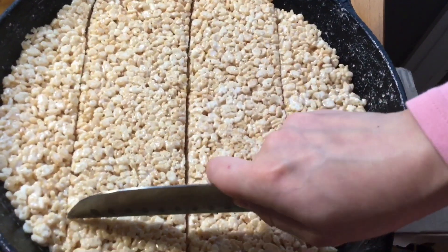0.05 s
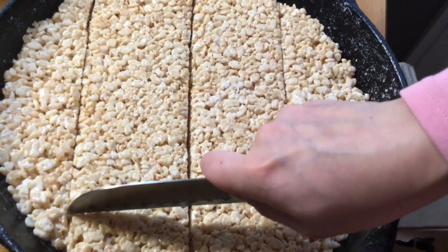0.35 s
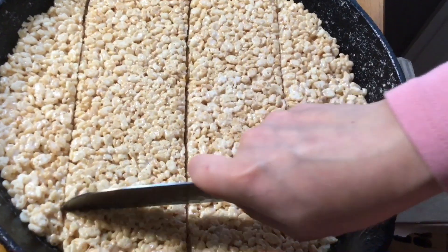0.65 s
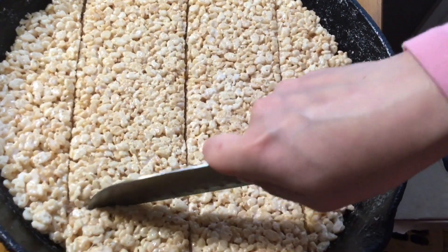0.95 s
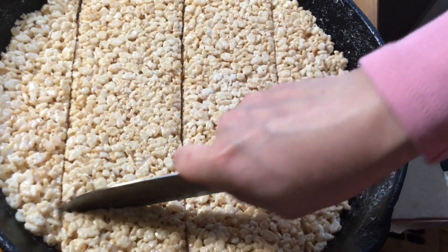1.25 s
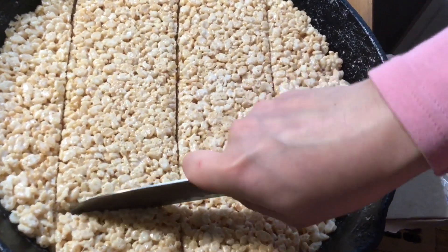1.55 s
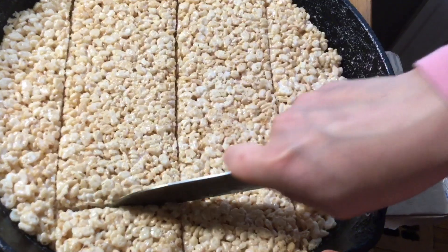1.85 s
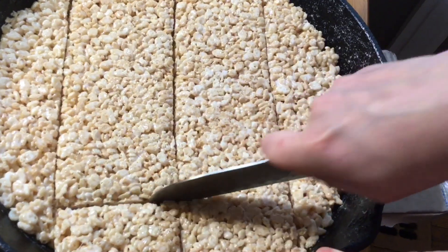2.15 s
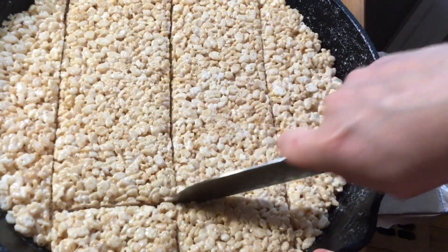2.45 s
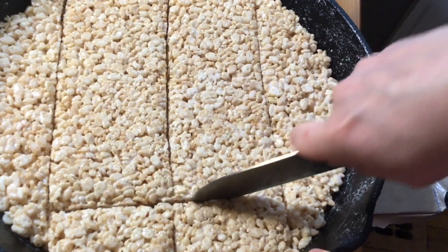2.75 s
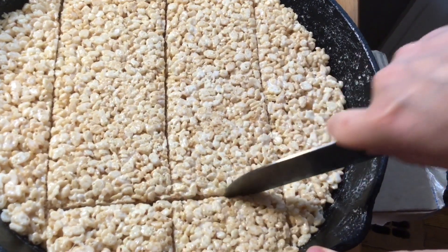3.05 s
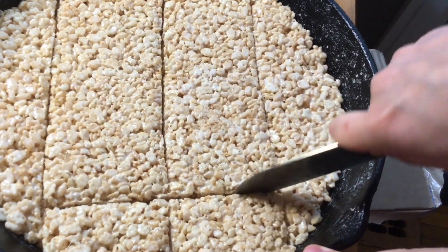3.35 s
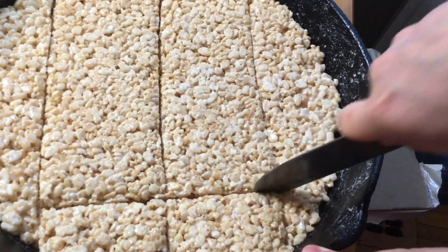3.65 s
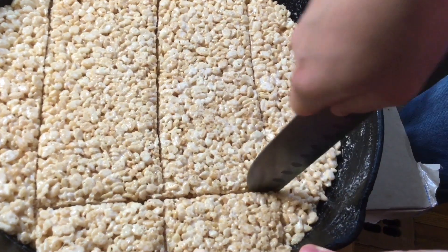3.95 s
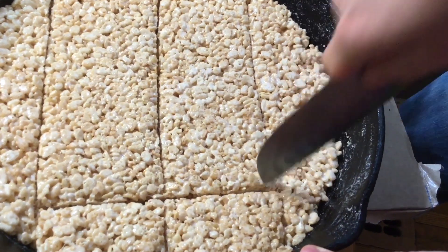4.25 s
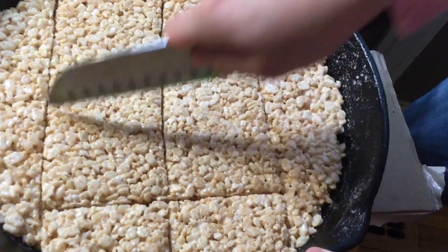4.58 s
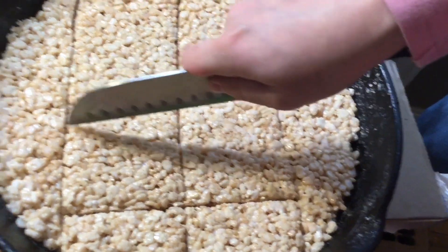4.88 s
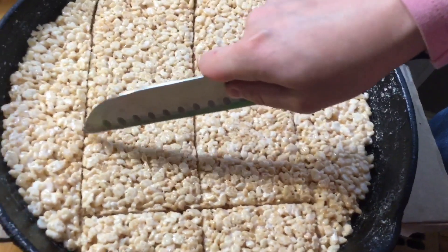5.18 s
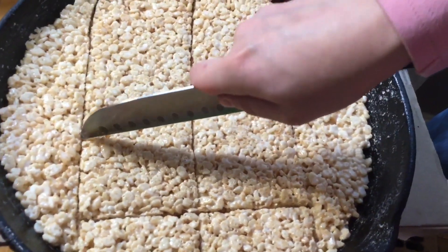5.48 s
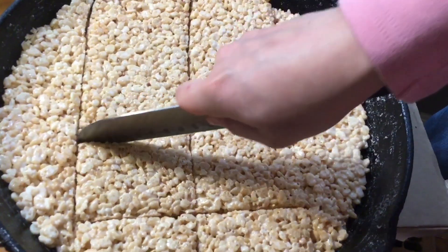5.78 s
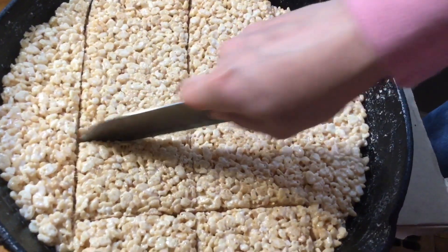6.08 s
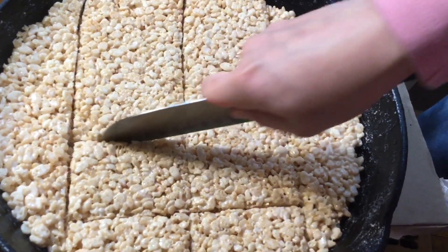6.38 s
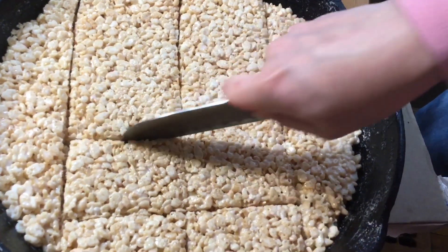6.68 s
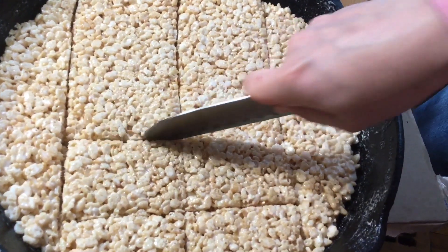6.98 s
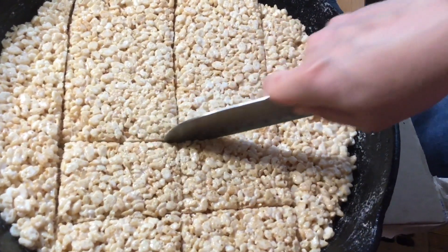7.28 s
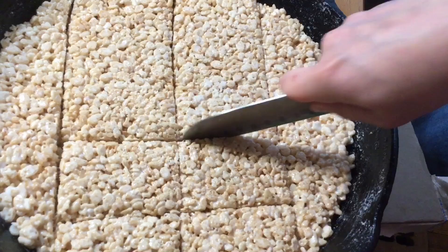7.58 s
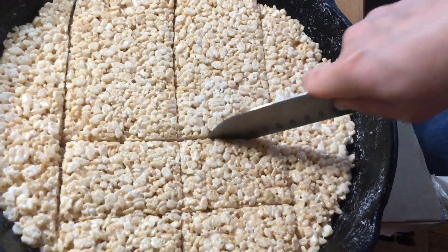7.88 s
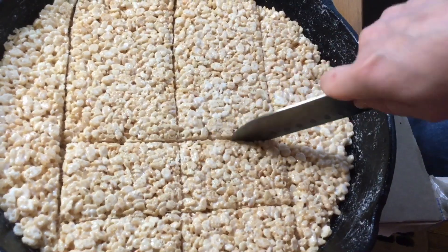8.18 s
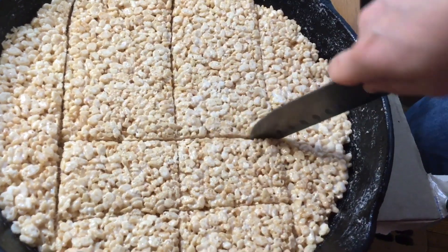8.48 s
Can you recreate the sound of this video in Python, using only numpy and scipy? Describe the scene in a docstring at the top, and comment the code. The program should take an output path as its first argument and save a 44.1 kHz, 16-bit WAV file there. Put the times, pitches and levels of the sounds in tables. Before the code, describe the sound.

A knife rests on crisp rice cereal treats in an iron skillet, giving faint ticks and a few tiny snaps. From about 0.5 seconds it rocks through the slab in quick, uneven pushes, each a burst of bright, dry crackle with sharp snaps. The crunch grows deeper, and between 2.5 and 3.7 seconds the blade clacks lightly on the iron several times while the pan thuds softly on the table. The cut fades by 4.3 seconds, leaving a pause with a faint bump or two. At about 5.6 seconds a second cut begins, crackling and crunching in the same way, with short knocks on the iron, clearest around 6.1, 7.3 and 7.9 seconds. It ends near 8.5 seconds with a few faint ticks. Everything is close, in a quiet kitchen with a steady low electrical hum.

```python
"""Faint ticks and a few snaps come first: a knife rests on crisp rice treats in an iron skillet.
It then rocks through the slab in two long cuts, close by in a quiet kitchen. Each push bursts a
shower of puffed grains, crunches deeper and often ends with the blade knocking on the iron.
Pan and table thud under the hand; a low mains hum runs throughout."""
import sys
import numpy as np
from scipy import signal
from scipy.fft import rfft, irfft
from scipy.io import wavfile
from scipy.ndimage import uniform_filter1d

SR = 44100
rng = np.random.default_rng(int(sys.argv[2]) if len(sys.argv) > 2 else 0)


def to_wav(s):
    """Save 16-bit WAV."""
    ch = np.atleast_2d(s).T  # columns
    pcm = np.round(np.clip(ch, -1, 1) * 32767)  # PCM
    wavfile.write(sys.argv[1], SR, pcm.astype(np.int16))


N = 384993

# Table levels are relative; each source adds its own gain.
# grains crushed by the pushes: (time [s], crackle level [dB], crunch level [dB])
CRUSH_LEVELS = [(0.36, -83, -88), (0.375, -46, -58), (0.42, -63, -72), (0.44, -68, -67), (0.46, -58, -72),
                (0.468, -66.5, -64), (0.508, -56, -70), (0.532, -47, -60), (0.564, -44.5, -58),
                (0.572, -36, -56), (0.612, -36.5, -57), (0.628, -36, -37), (0.656, -30.5, -50),
                (0.671, -36, -47), (0.687, -33.5, -51), (0.723, -37.5, -51), (0.751, -50.5, -59.5),
                (0.827, -47, -68), (0.855, -40, -58), (0.867, -47.5, -57), (0.899, -39, -68),
                (0.935, -46.5, -59.0), (0.943, -36.5, -57), (0.967, -57, -65), (0.991, -46, -63),
                (1.011, -44.5, -55), (1.031, -34.5, -57), (1.051, -37.5, -57), (1.075, -24, -52),
                (1.13, -33.5, -48), (1.146, -28, -49), (1.182, -58, -62), (1.23, -71, -73),
                (1.274, -43, -54.5), (1.374, -39, -45.5), (1.414, -59, -69), (1.418, -47, -63),
                (1.442, -30, -46.5), (1.514, -24.5, -35.5), (1.549, -60, -52), (1.589, -53, -65),
                (1.613, -40.5, -51.5), (1.713, -33.5, -37), (1.757, -40, -48.0), (1.773, -56, -61),
                (1.781, -36.0, -44.0), (1.801, -23.5, -39), (1.861, -30, -37), (1.885, -50, -49.5),
                (1.925, -60, -60), (1.988, -41, -48), (2.036, -37, -40), (2.104, -43, -52.5),
                (2.172, -23.5, -32), (2.252, -56, -57.5), (2.308, -37, -42.5), (2.328, -40.5, -44.5),
                (2.376, -33, -39), (2.412, -46, -50), (2.42, -50.0, -66), (2.423, -37.0, -46),
                (2.487, -33.5, -34), (2.551, -69, -62), (2.583, -43, -45.5), (2.627, -32.5, -41.5),
                (2.671, -46, -41), (2.711, -52, -57.5), (2.731, -38, -40.5), (2.775, -32.5, -38),
                (2.795, -58, -55), (2.819, -52, -59), (2.914, -41.5, -41.5), (2.974, -42.5, -42),
                (3.006, -46.5, -57), (3.03, -29, -35), (3.05, -37.5, -38), (3.082, -31.5, -37),
                (3.134, -42.5, -41.5), (3.146, -54, -59), (3.242, -36.5, -40), (3.282, -49.5, -58),
                (3.305, -35, -40), (3.357, -37, -37.5), (3.377, -61, -56), (3.433, -62, -58.5),
                (3.437, -49, -48), (3.501, -42, -42), (3.569, -54.0, -61), (3.577, -42.5, -54),
                (3.609, -69, -72), (3.625, -44, -47), (3.673, -38.5, -39.5), (3.685, -58, -59),
                (3.768, -72.5, -66.0), (3.78, -64, -60), (3.856, -67, -74.5), (3.888, -63, -69),
                (3.892, -36, -46.5), (3.972, -65.5, -74), (3.988, -42, -45), (4.012, -61.0, -64),
                (4.064, -78.5, -72), (4.104, -73.0, -63), (4.128, -79.0, -77), (4.172, -57.5, -57.5),
                (4.195, -64, -71), (4.215, -52.5, -55.5), (4.319, -86, -80), (5.59, -81, -84),
                (5.602, -88, -81), (5.61, -49, -57.5), (5.642, -40.5, -45), (5.67, -44.5, -59),
                (5.726, -37, -49.0), (5.758, -39, -52.0), (5.762, -32, -44), (5.854, -34, -46.5),
                (5.894, -62, -66.5), (5.938, -42.5, -54), (5.989, -50, -59.0), (6.037, -70, -79),
                (6.041, -47, -65), (6.049, -40.5, -54), (6.081, -33.5, -41), (6.129, -39, -55),
                (6.133, -36, -33), (6.145, -64, -49), (6.193, -62, -62), (6.209, -38.5, -40.5),
                (6.265, -38.5, -45.5), (6.333, -43.5, -55), (6.345, -50, -66), (6.365, -36.5, -50),
                (6.444, -37, -45.5), (6.488, -66, -66), (6.512, -42.0, -51.5), (6.584, -38, -45),
                (6.592, -31.5, -42.5), (6.652, -49.5, -60), (6.672, -32, -45.5), (6.704, -29, -39),
                (6.752, -47, -42.5), (6.792, -61, -64.0), (6.831, -41, -45), (6.927, -45, -53),
                (6.943, -67, -66), (6.959, -42, -58.5), (6.987, -35, -45), (6.999, -45, -48),
                (7.027, -30.5, -39), (7.071, -62, -60.5), (7.107, -40.5, -54), (7.119, -44.5, -53),
                (7.155, -36.5, -46.5), (7.211, -33, -44.5), (7.227, -48, -58), (7.298, -24.5, -34),
                (7.33, -50.0, -49), (7.378, -63, -52), (7.398, -38.5, -48), (7.486, -38.5, -44.5),
                (7.522, -50.0, -65), (7.594, -32, -35.5), (7.626, -61, -49), (7.65, -65.0, -58.0),
                (7.682, -39, -47), (7.69, -45, -53.0), (7.737, -38.0, -41.5), (7.805, -43.5, -51),
                (7.817, -60, -67), (7.833, -34, -51), (7.841, -42.0, -49.0), (7.869, -27.5, -36.5),
                (7.933, -59, -55), (7.961, -43.5, -51), (7.985, -47.5, -54.0), (8.033, -46.5, -48.5),
                (8.085, -47.5, -56), (8.097, -58, -66), (8.113, -40.5, -47), (8.148, -39.5, -52),
                (8.156, -34, -38.5), (8.184, -31, -45), (8.2, -50, -48), (8.224, -47.0, -57),
                (8.252, -36.5, -45), (8.264, -47.5, -55), (8.308, -36, -42.5), (8.34, -33, -47),
                (8.356, -45.5, -56.0), (8.42, -40.5, -45.5), (8.472, -63, -70.5), (8.56, -76.5, -74.5)]
# force reaching the pan: (time [s], drag level [dB], thud level [dB])
PAN_LEVELS = [(0.44, -79, -73.0), (0.536, -78, -78), (0.552, -62, -60), (0.608, -76, -61.5),
              (0.663, -60, -58.0), (0.687, -73, -53), (0.767, -77.0, -72), (0.991, -74.5, -70),
              (1.035, -72, -68.5), (1.146, -61.5, -45), (1.21, -77, -77), (1.382, -64, -64),
              (1.43, -83, -76.0), (1.45, -66, -62), (1.514, -50, -43.5), (1.597, -74.0, -57),
              (1.725, -60.5, -68), (1.769, -79, -62), (1.797, -56, -49), (1.853, -60, -51),
              (1.857, -41, -51), (1.877, -51, -44.5), (1.937, -68, -57.5), (2.04, -66.0, -64),
              (2.088, -67.0, -61.0), (2.128, -63.0, -58), (2.208, -50.5, -52), (2.268, -77, -59),
              (2.356, -55.5, -58), (2.392, -70, -64), (2.523, -52, -48), (2.555, -64.5, -68),
              (2.603, -78, -64.0), (2.651, -45.5, -55), (2.683, -55, -51), (2.727, -75, -72),
              (2.759, -65, -56), (2.807, -54, -49), (2.859, -70.0, -70), (2.934, -66, -60),
              (2.946, -48, -56.5), (2.978, -55, -53), (3.006, -75.5, -43), (3.026, -67, -60),
              (3.066, -58.5, -55), (3.194, -68, -66), (3.337, -67.0, -60), (3.357, -68, -46),
              (3.381, -66.5, -45), (3.401, -67.5, -71), (3.549, -58.5, -54), (3.629, -88, -78),
              (3.681, -62.0, -46), (3.729, -57, -56), (3.784, -76.0, -70.5), (3.968, -81, -76.0),
              (4.024, -79, -63), (4.1, -77.5, -80), (5.57, -78.5, -77), (5.65, -61.5, -57),
              (5.686, -73, -62), (5.71, -65.0, -60), (5.854, -52.5, -53), (5.922, -88, -70.0),
              (5.938, -64, -67.0), (6.037, -73, -77.5), (6.089, -46, -48), (6.157, -59, -47.5),
              (6.193, -66, -59.5), (6.237, -54, -49.0), (6.273, -58, -67), (6.349, -70, -76),
              (6.365, -60, -66), (6.44, -49, -48), (6.652, -68, -72), (6.68, -50.5, -53),
              (6.756, -47.5, -48.5), (6.788, -70, -65.0), (6.835, -51.5, -59.0), (6.895, -67, -75.5),
              (6.939, -68, -65), (7.051, -44.5, -51), (7.079, -59.5, -64), (7.243, -58, -66.0),
              (7.255, -54, -59), (7.334, -43, -55.5), (7.382, -55.5, -63), (7.522, -62, -64),
              (7.55, -75, -76.5), (7.558, -55.5, -56), (7.614, -43, -53.0), (7.674, -60.5, -69),
              (7.737, -58, -57), (7.801, -65.0, -61), (7.829, -70.5, -75), (7.865, -50, -52),
              (7.917, -46.5, -50), (7.961, -54.5, -61.0), (8.097, -71, -67), (8.156, -53, -59),
              (8.196, -46, -53), (8.256, -57.5, -60), (8.336, -62.5, -54.5), (8.444, -60.0, -59.5),
              (8.46, -51, -51.5), (8.56, -71, -68)]
# blade depth in the slab: (time [s], depth [0-1])
BLADE_DEPTH = [(0.5, .02), (1.15, 0.13), (1.5, 0.6), (1.85, 0.68), (2.2, 0.34), (2.6, 0.27), (3.0, .95),
               (3.7, 0.92), (4.2, 0.65), (5.7, 0.1), (6.15, .3), (6.6, 0.04), (7.3, 0.05), (7.8, .2),
               (8.4, 0.62)]
# blade resting on the crust: (start [s], end [s], tick level [dB])
BLADE_RESTS = [(0.06, 0.33, -41), (0.44, 0.56, -26), (5.47, 5.6, -45), (8.54, 8.7, -49)]
# single loud grains: (time [s], level [dB], pitch [Hz], splinter spray [0-1])
GRAIN_SNAPS = [(0.1082, -35, 12000, 0.3), (0.1321, -28, 10500, 0.1), (0.166, -39, 10700, 0.2),
               (0.2752, -25.5, 9500, 0.1), (0.367, -30, 7170, 0.2), (0.369, -14.5, 12300, 0.4),
               (0.387, -24, 11900, 0.2), (0.4, -34, 14400, 0.2), (0.4571, -29, 12600, 0),
               (0.494, -22, 10900, 0.3), (0.5257, -20.5, 11600, 0.2), (0.5384, -12, 14900, 0.1),
               (0.5715, -14.5, 10000, 0.2), (0.5763, -11, 11700, 0.3), (0.5844, -16, 11500, 0.2),
               (0.6177, -15, 12200, 0.2), (0.6265, -4.5, 10800, 0.5), (0.6417, -10, 10600, 0.1),
               (0.6676, -2.5, 9900, 0.26), (0.6728, -5.5, 15100, 0.2), (0.691, -13, 11400, 0.6),
               (0.6978, -12, 9880, 0), (0.7204, -12.5, 10300, 0), (0.725, -21, 10400, 0.3),
               (0.7998, -24, 10000, 0.3), (0.8114, -27, 11100, 0.3), (0.855, -16, 10600, 0.2),
               (0.8884, -27, 13000, 0.2), (0.8988, -20, 9160, 0.5), (0.9717, -30, 7040, 0.2),
               (0.9901, -19.5, 10100, 0.3), (0.9977, -18, 10300, 0.3), (1.042, -8, 9900, 0.05),
               (1.0618, -9, 8370, 0.2), (1.073, -7, 10500, 0), (1.0896, -14, 9840, 0.2),
               (1.2735, -31, 10000, 0.2), (1.464, -9, 10200, 0.2), (1.4712, -8, 12100, 0.2),
               (1.506, -6, 10600, 0.3), (1.5712, -24, 10400, 0.2), (1.7802, -17, 5640, 0.3),
               (1.8, -11, 5360, 0), (2.1256, -16, 5760, 0.2), (2.3328, -14, 7480, 0.3),
               (2.3746, -12, 9900, 0.3), (2.425, -18, 7410, 0.1), (2.5804, -23, 8820, 0.2),
               (2.7182, -25, 8720, 0.2), (2.7303, -19, 8830, 0.3), (2.7574, -11, 5010, 0.3),
               (2.8365, -20.5, 8750, 0.6), (2.8612, -17.5, 9400, 0.4), (2.975, -21, 5590, 0.3),
               (3.024, -18, 5750, 0.1), (3.1513, -25, 5420, 0.4), (3.301, -19, 5850, 0.3),
               (3.5598, -21.5, 5350, 0.2), (3.6327, -20.5, 12100, 0.2), (3.7778, -35, 5270, 0.2),
               (3.8661, -32, 5260, 0.4), (3.8914, -18, 8950, 0.2), (3.9865, -26.5, 5300, 0.2),
               (5.5099, -42, 10900, 0.2), (5.5283, -45, 9530, 0.2), (5.588, -40, 10600, 0.2),
               (5.6093, -14.5, 13700, 0.3), (5.6271, -17, 10200, 0.2), (5.641, -12, 8600, 0.1),
               (5.7134, -22, 10200, 0.2), (5.7224, -16, 9780, 0.3), (5.7614, -22, 11500, 0.2),
               (5.8135, -10, 5850, 0.6), (5.853, -23, 11100, 0.2), (5.87, -31, 6590, 0.2),
               (6.0313, -31, 9280, 0), (6.0422, -23, 12900, 0.3), (6.2078, -32, 4270, 0.2),
               (6.3654, -18, 9320, 0.6), (6.4064, -17, 9320, 0.2), (6.6573, -23, 10000, 0.2),
               (6.6753, -5.5, 9650, 0.1), (6.9586, -32, 8950, 0.2), (7.007, -17, 9000, 0.5),
               (7.238, -15, 10600, 0.3), (7.399, -26, 9720, 0.1), (7.5428, -20.5, 10400, 0.5),
               (7.832, -24, 9810, 0.2), (8.1127, -16.5, 10900, 0.1), (8.1558, -8, 7560, 0.2),
               (8.672, -33, 10600, 0.4), (8.6944, -32, 10000, 0.3)]
# blade on iron: (time [s], level [dB], clack centre [Hz], half width [oct], chatter decay [s],
# thud re clack [dB])
BLADE_KNOCKS = [(2.493, -16, 2100, 0.19, 0.005, -24), (2.757, -19, 2300, 0.63, 0.0027, -22),
                (2.789, -24, 1830, .3, 0.0026, -23), (3.353, -18.5, 2280, 0.17, 0.0027, -15),
                (3.355, -20.5, 1640, 0.14, 0.0004, -27), (3.674, -14.5, 1560, 0.14, 0.00082, -23),
                (3.675, -23, 2350, .2, 0.0013, -25), (6.068, -31, 1530, 0.51, .002, -24),
                (6.091, -18.5, 1320, 0.73, 0.0034, -20), (6.112, -17.5, 2200, 0.96, 0.0071, -28),
                (6.117, -14.5, 4180, 0.13, .008, -17), (6.217, -21, 2740, 0.48, 0.0036, -23),
                (6.443, -24, 1200, .6, .002, -9), (6.734, -29.5, 4270, 0.099, 0.0045, -13),
                (7.041, -30.5, 930, 0.68, 0.0022, -14), (7.311, -5, 2300, 0.42, 0.0013, -38),
                (7.313, -22, 920, .3, 0.0011, -30), (7.596, -18.5, 1920, 0.25, 0.0047, -20),
                (7.895, -8.5, 2170, .3, 0.003, -24), (7.897, -28, 940, 0.26, .001, -30),
                (8.189, -14.5, 2090, 0.21, 0.0019, -16), (8.190, -27.5, 970, .3, .001, -30),
                (8.449, -32.5, 897, 0.98, 0.0057, -2.5)]
# pan rocking on the table: (time [s], level [dB], pitch [Hz])
PAN_BUMPS = [(1.55, -41, 143), (2.499, -33, 122), (2.784, -47, 221), (3.018, -43.5, 87.5),
             (3.358, -41, 226), (3.689, -31.5, 88), (3.719, -38, 95), (4.612, -43.5, 146),
             (4.939, -52, 86.1), (6.138, -39, 259), (8.7, -45, 223)]
# modes of blade and loaded skillet: (frequency [Hz], level [dB], T60 [s])
PAN_MODES = [(489, -19.5, 0.12), (677, -10, 0.11), (920, -11.5, 0.028), (1054, -6.5, 0.054),
             (1569, -1.5, .05), (1724, -13, 0.055), (2003, -5, 0.11), (2300, -3, .04), (2600, -11, 0.037),
             (2820, -13.5, 0.037), (3110, -6, 0.086), (3800, -2, 0.057), (4292, -1, 0.039),
             (5360, -5, 0.057), (6560, -7, 0.068), (7800, -7.5, 0.042), (8900, -9.5, 0.037),
             (10600, -5, .045)]
# spectra of the layers of a push, and of the room noise: (frequency [Hz], gain [dB])
CRUST_EQ = [(1000, -42), (2500, -20), (4000, -13.5), (5300, -9), (7000, -3.5), (8700, 1), (10300, 3),
            (12500, -4), (15500, -4.5)]
DEEP_EQ = [(1000, -44), (3000, -16), (4300, -5), (5200, 0.5), (6300, -1.5), (7400, -3.5), (8500, -3),
           (10300, -2), (12500, -6), (15500, -13.5)]
CRUNCH_EQ = [(700, -35), (1250, -11.5), (1550, -6), (1950, -2.5), (2400, 2), (2850, -1), (3300, -1.5),
             (4300, -2), (5400, -1.5), (7500, -15), (12000, -23.5)]
DRAG_EQ = [(250, -22.5), (390, -13), (490, 2), (590, -3.5), (680, -1.5), (780, -6.5), (950, 0), (1100, 1.5),
           (1350, -6), (2200, -31)]
THUD_EQ = [(50, -15), (90, -11), (140, -6), (175, -6), (235, 3.5), (285, -11), (340, -17.5), (600, -34)]
AIR_EQ = [(20, -17.5), (43, -12.5), (62, -4), (88, -19.5), (113, -17.5), (262, -23), (446, -25.5),
          (825, -31.5), (2500, -34.5), (7100, -37.5), (14700, -43.5), (16000, -46.5)]
# kitchen reverberation: (frequency [Hz], T60 [s])
KITCHEN_T60 = [(150, 0.2), (600, 0.26), (2000, 0.17), (6000, 0.15), (15000, 0.11)]

HUM_HZ, HUM_RMS_DB = 60.1, -52.5
AIR_RMS_DB = -65.5  # above 300 Hz
CUTOFF_HZ = 16050


def cutting():
    """The crust crackles, darker with depth; the inside crunches; breaking grains shake the pan."""
    shallow = shower(CRUST_EQ, 3500, 15600, per_s=4000, size_db=3.5, cycles=0.96, clump_db=2.5,
                     window_s=0.045)
    deep = shower(DEEP_EQ, 3400, 17700, per_s=7000, size_db=3.5, cycles=1.7, clump_db=3.5,
                  window_s=0.049)
    depth = curve(BLADE_DEPTH, 1)
    crackle = np.sqrt(1 - depth) * shallow + np.sqrt(depth) * deep
    crunch = shower(CRUNCH_EQ, 1325, 5970, per_s=3000, size_db=2.5, cycles=1.5, clump_db=0.8,
                    window_s=0.047)
    drag = shower(DRAG_EQ, 410, 1400, per_s=1200, size_db=2.5, cycles=0.75, clump_db=2.5, window_s=0.082)
    thud = shower(THUD_EQ, 91, 400, per_s=800, size_db=1.0, cycles=0.17, clump_db=6.5, window_s=0.14)
    return (crackle * amp(curve(CRUSH_LEVELS, 1) + 1.15) + crunch * amp(curve(CRUSH_LEVELS, 2) - 1.2)
            + drag * amp(curve(PAN_LEVELS, 1) - 3.1) + thud * amp(curve(PAN_LEVELS, 2) - 1.76))


def shower(eq, low_hz, high_hz, per_s, size_db, cycles, clump_db, window_s, pitches=24):
    """Grains of many sizes break in clumps; levelled over window_s, so the level tables shape it."""
    clumps = amp(clump_db * unit_rms(uniform_filter1d(rng.standard_normal(N), 128)))
    sizes = amp(size_db * np.minimum(rng.exponential(1, N), 5)) * rng.choice([-1, 1], N)
    breaks = clumps * sizes * impulses(per_s)
    pitch_index = rng.integers(0, pitches, N)
    grains = np.zeros(N)
    for k, hz in enumerate(np.linspace(low_hz, high_hz, pitches)):
        grain = unit_rms(cell_burst(hz, ring_s=cycles / hz, tear_s=0.00031, tear_gain=0.25))
        grains += signal.oaconvolve(breaks * (pitch_index == k), grain)[:N]
    sound = coloured(grains, eq)
    window = signal.windows.hann(2 * int(window_s * SR / 2) + 1)
    power = abs(signal.oaconvolve(sound ** 2, window / window.sum(), "same"))
    return sound / np.sqrt(power + 1e-12)


def cell_burst(hz, ring_s, tear_s, tear_gain, samples=256):
    """One cell wall breaks: a very short ring and a spit of tearing noise."""
    t = np.arange(samples) / SR
    ring = np.sin(2 * np.pi * hz * t) * np.exp(-t / ring_s)
    tear = np.diff(rng.standard_normal(samples + 1)) * np.exp(-t / tear_s)
    return ring + tear_gain * tear


def snaps():
    """A whole puffed grain gives way, with a dying spray of splinters."""
    out, t = np.zeros(N), np.arange(SR // 40) / SR
    eq = [(300, -14), (900, -7.5), (2000, 2.5), (6000, 6.5), (11000, 9.5), (16000, 1)]
    for time_s, db, hz, spray in GRAIN_SNAPS:
        splinters = rng.standard_normal(len(t)) * impulses(1500, len(t)) * np.exp(-t / 0.004)
        breaks = (t == 0) + spray * splinters
        grain = cell_burst(hz, ring_s=0.0001, tear_s=0.0011, tear_gain=0.22)
        snap = coloured(signal.oaconvolve(breaks, grain)[:len(t)], eq)
        add(out, time_s, amp(db) * snap / np.linalg.norm(snap))
    return amp(6.5) * out


def pops():
    """Stray grains near the top burst broadband, louder with a harder push."""
    sizes = amp(5.45 * np.minimum(rng.exponential(1, N), 2)) * impulses(per_s=45)
    eq = [(300, -20.5), (900, -12.5), (2100, 2), (6000, 1.5), (11000, 2), (16000, -2.5)]
    pop = coloured(cell_burst(9700, ring_s=0.00006, tear_s=0.00065, tear_gain=0.14), eq)
    push = amp(curve(CRUSH_LEVELS, 1) + 11) * (1 - curve(BLADE_DEPTH, 1))
    return signal.oaconvolve(sizes * push, pop / np.linalg.norm(pop))[:N]


def flake_ticks():
    """Tiny flakes tick under the edge resting on the crust."""
    t = np.arange(N) / SR
    ticks = amp(-14 * rng.random(N)) * impulses(per_s=60)
    touch = sum(amp(db) * (t > start_s) * (t < end_s) for start_s, end_s, db in BLADE_RESTS)
    flake = coloured(cell_burst(11000, ring_s=0.0001, tear_s=0.0003, tear_gain=0.2), CRUST_EQ)
    return signal.oaconvolve(ticks * touch, flake / abs(flake).max())[:N]


def knocks():
    """The edge breaks through and chatters on the iron; its free length sets the clack's pitch."""
    out, t = np.zeros(N), np.arange(SR // 4) / SR
    ring_eq = [(400, 2), (1000, 5.5), (2500, 4.5), (5300, 2), (8000, -11.5)]
    thud = unit_rms(np.sin(2 * np.pi * 232 * t) * np.exp(-t / 0.017) * (1 - np.exp(-t / 0.0029)))
    for time_s, db, hz, half_oct, chatter_s, thud_db in BLADE_KNOCKS:
        chatter = rng.standard_normal(len(t)) * np.exp(-t / chatter_s)
        blow = unit_rms(t == 0) + 0.94 * unit_rms(chatter)
        band_hz = [hz / 2 ** half_oct, hz * 2 ** half_oct]
        bandpass = signal.butter(3, band_hz, "band", fs=SR, output="sos")
        clack = unit_rms(signal.sosfilt(bandpass, blow))
        ring = unit_rms(pan_ring(coloured(blow, ring_eq)))
        add(out, time_s, amp(db) * (clack + amp(-7.5) * ring + amp(thud_db) * thud))
    return amp(-28) * out


def pan_ring(x):
    """Strikes and scrapes excite the modes of blade and skillet."""
    t = np.arange(SR // 8) / SR
    ring = sum(amp(db - 60 * t / t60_s) * np.sin(2 * np.pi * hz * t) for hz, db, t60_s in PAN_MODES)
    return signal.oaconvolve(x, ring / np.linalg.norm(ring))[:len(x)]


def bumps():
    """The heavy pan settles: a soft thump and a slower table wobble."""
    out, t = np.zeros(N), np.arange(SR // 3) / SR
    wobble = np.sin(2 * np.pi * 44 * t) * np.exp(-t / 0.074)
    attack = 1 - np.exp(-t / 0.004)
    for time_s, db, hz in PAN_BUMPS:
        thump = np.sin(2 * np.pi * hz * t) * np.exp(-t / 0.021)
        add(out, time_s, amp(db) * (thump + 0.45 * wobble) * attack)
    return amp(-1.5) * out


def kitchen_reverb(x):
    """Sparse reflections, each band decaying at its own rate."""
    taps = rng.standard_normal(SR // 2) * impulses(3000, SR // 2)
    taps[:SR // 400] = 0  # 2.5 ms pre-delay
    hz, t, spectrum = signal.stft(taps, SR, nperseg=256)
    decay = amp(-60 * t / at_hz(KITCHEN_T60, hz)[:, None])
    tail = signal.istft(spectrum * decay, SR)[1]
    return signal.oaconvolve(x, tail / np.linalg.norm(tail))[:N]


def hum_and_air():
    """Mains hum over faint, even room noise."""
    hum = np.sqrt(2) * amp(HUM_RMS_DB) * np.sin(2 * np.pi * HUM_HZ * np.arange(N) / SR)
    hz = np.fft.rfftfreq(N, 1 / SR)
    spectrum = rfft(rng.standard_normal(N)) * amp(at_hz(AIR_EQ, hz))
    upper_rms = irfft(spectrum * (hz > 300), N).std()
    return hum + amp(AIR_RMS_DB) * irfft(spectrum, N) / upper_rms


def amp(db):
    """Decibels to gain."""
    return 10 ** (np.asarray(db) / 20)


def unit_rms(x):
    """Scales to rms 1."""
    return x / np.sqrt(np.mean(x ** 2) + 1e-20)


def impulses(per_s, samples=N):
    """Random unit impulses at a mean rate."""
    return rng.random(samples) < per_s / SR


def curve(rows, column):
    """One column, interpolated linearly in time."""
    rows = np.array(rows)
    return np.interp(np.arange(N) / SR, rows[:, 0], rows[:, column])


def at_hz(points, hz):
    """Table lookup on a log frequency axis."""
    points_hz, values = np.transpose(points)
    return np.interp(np.log(hz + 1), np.log(points_hz + 1), values)


def coloured(x, eq, size=4096):
    """Minimum-phase filter from (frequency [Hz], gain [dB]); clicks keep sharp fronts."""
    log_gain = np.log(amp(at_hz(eq, abs(np.fft.fftfreq(size, 1 / SR)))))
    taps = np.fft.ifft(np.exp(np.conj(signal.hilbert(log_gain)))).real
    return signal.oaconvolve(x, taps[:size // 2])[:len(x)]


def add(mix, time_s, sound):
    """Mixes a sound in at time_s."""
    part = mix[max(round(time_s * SR), 0):][:len(sound)]
    part += sound[:len(part)]


def scene():
    """Close grains ring faintly in the blade; the pan radiates more into the room. Mono."""
    grains = cutting() + pops() + snaps()
    grains += amp(-15) * pan_ring(grains)
    pan = knocks() + bumps()
    room = kitchen_reverb(amp(-17.5) * grains + amp(-12) * pan)
    return (grains + pan + room + hum_and_air() + flake_ticks())[None]


def record(dry):
    """Steep low-pass at CUTOFF_HZ."""
    lowpass = signal.firwin(255, CUTOFF_HZ, window=("kaiser", 8), fs=SR)
    return signal.oaconvolve(dry, lowpass[None], "same")


dry = scene()
out = record(dry)
to_wav(out)
```